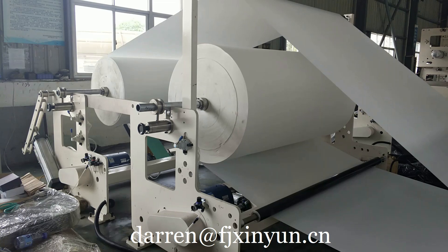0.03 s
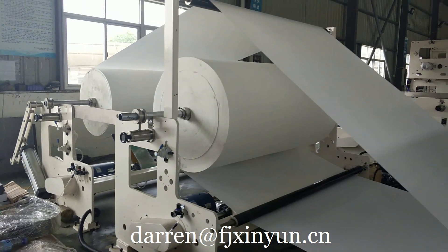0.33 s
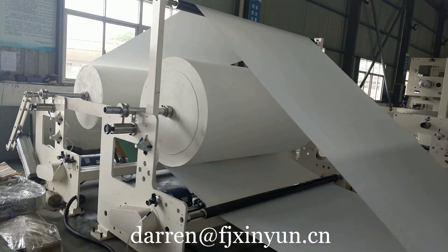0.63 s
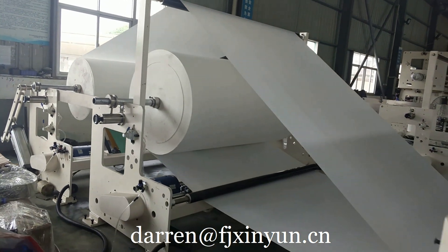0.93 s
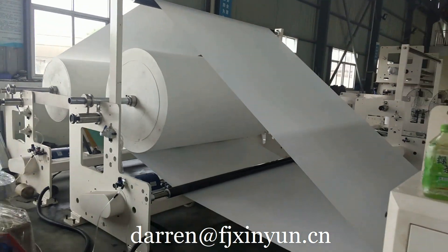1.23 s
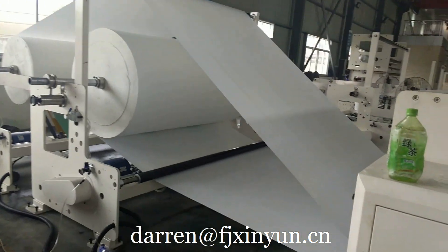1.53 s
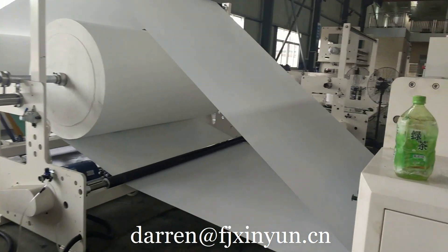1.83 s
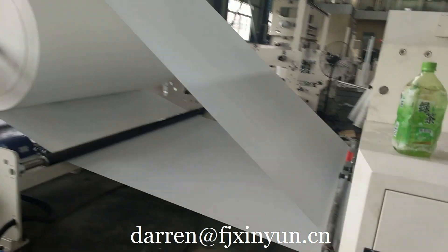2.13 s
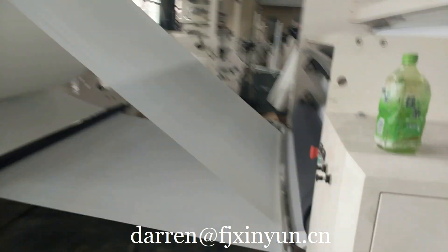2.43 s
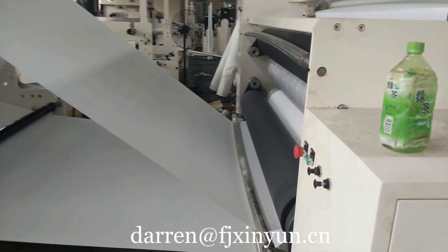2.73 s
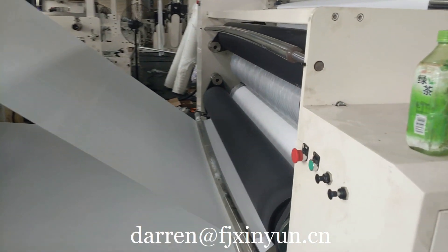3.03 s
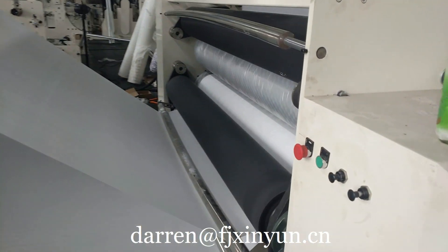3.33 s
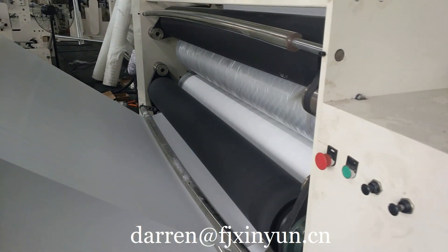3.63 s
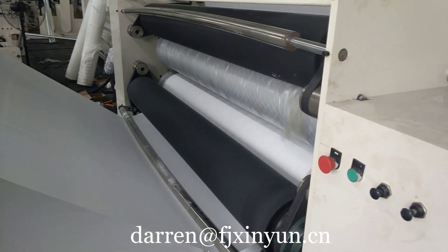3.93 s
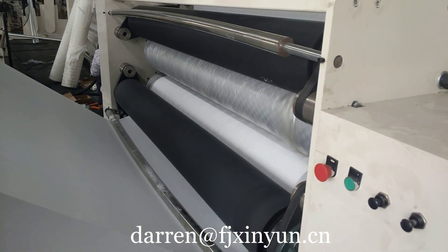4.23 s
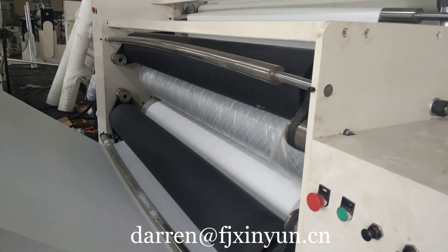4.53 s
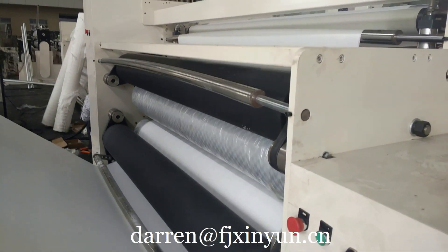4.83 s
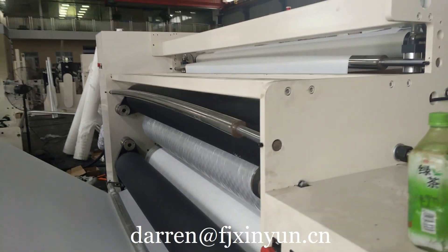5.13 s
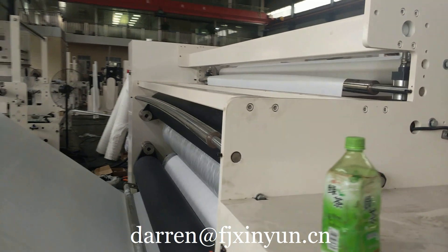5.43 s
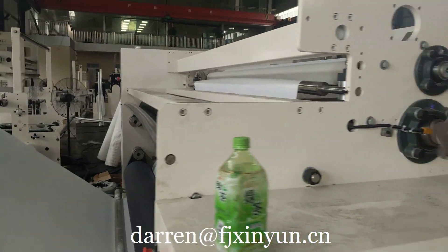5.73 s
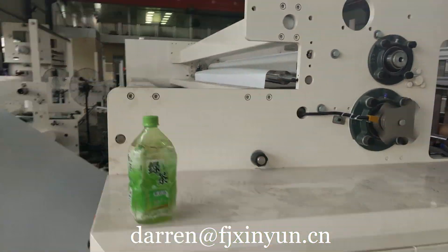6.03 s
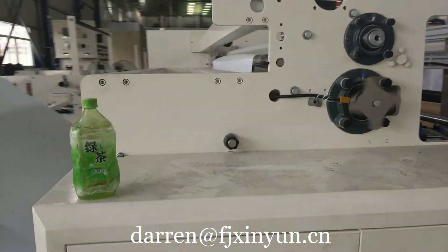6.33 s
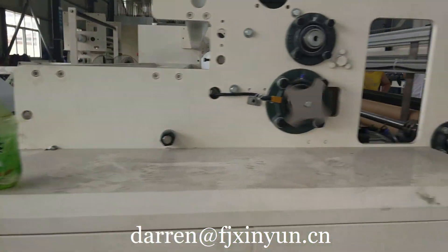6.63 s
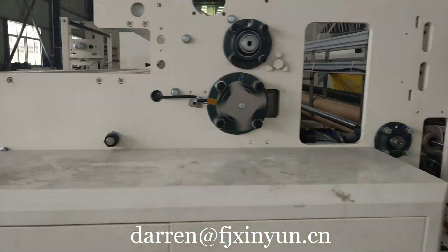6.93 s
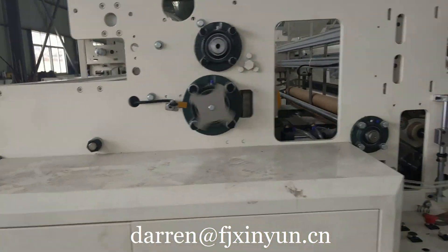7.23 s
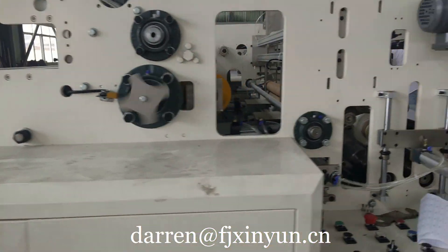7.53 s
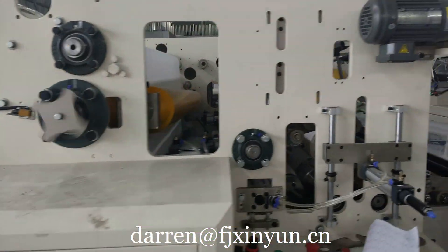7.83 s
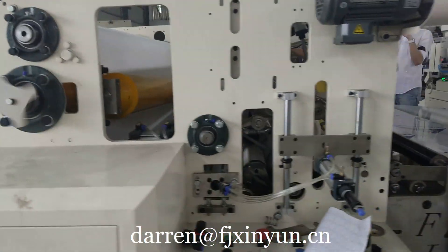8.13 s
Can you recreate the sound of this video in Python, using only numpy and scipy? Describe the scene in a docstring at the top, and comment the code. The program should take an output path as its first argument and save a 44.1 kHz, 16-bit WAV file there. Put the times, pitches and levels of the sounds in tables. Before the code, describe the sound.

Heard by someone walking alongside it in a factory hall, a large paper machine starts abruptly after brief silence and settles to full speed. Paper rustles and hisses in quick pulses, rollers whine at a high pitch, and the drive hums and throbs underneath. Small metal knocks, clinks and faint squeaks dot the noise. It swells midway beside the rollers, a hard clack follows nearby, and the hiss and whine swell again at the end.

```python
"""In a factory hall, a listener walks along a paper rewinder as it comes up to speed.
The drive throbs and forces frame, panels and rollers into low resonance. The paper web rustles, hisses
and chirps four times a turn of the embossing roller, whose teeth whine; the unwinding reel rasps once
a turn. Steel knocks, clinks and pings, something clacks close by, and last a gear motor growls. Paper
and whine are louder at each opening in the frame. The sound cuts in after a moment of silence."""
import sys
import numpy as np
from scipy import signal
from scipy.fft import rfft, irfft, next_fast_len
from scipy.io import wavfile
from scipy.ndimage import map_coordinates

SR = 44100
rng = np.random.default_rng(int(sys.argv[2]) if len(sys.argv) > 2 else 0)


def unload_wav(signal):
    """Save mono or channel-first audio to the path in sys.argv[1] as 16-bit WAV at rate SR, clipped to [-1, 1]."""
    wavfile.write(
        sys.argv[1],
        SR,
        np.round(np.clip(np.atleast_2d(signal).T, -1, 1) * 32767).astype(np.int16),
    )


N = 365588
ROLLER_HZ, DRIVE_HZ = 6.245, 3.572  # turns a second at running speed


def undb(db):
    """Amplitude ratio of a level: a factor of ten for every 20 dB."""
    return 10 ** (np.asarray(db) / 20)


def curve(table):
    """Linear interpolation of (t/s, value) rows at every sample."""
    return np.interp(np.arange(N) / SR, *np.transpose(table))


def passing(at_s, half_s):
    """Gaussian envelope: 1 at at_s, 1/e at half_s to either side."""
    return np.exp(-((np.arange(N) / SR - at_s) / half_s) ** 2)


def colour(points, hz):
    """Interpolation of (f/Hz, value) rows on a logarithmic frequency axis."""
    f, value = np.transpose(points)
    return np.interp(np.log(hz + 1), np.log(f), value)


def unit(x):
    """Normalisation: the mean of the two channels gets rms 1."""
    return x / np.std(x.mean(axis=0))


def pan(db):
    """Left and right gains for an interaural level difference, left minus right."""
    return undb(np.array([[1], [-1]]) * db / 2)


def noise():
    """White noise, uncorrelated between the ears."""
    return rng.standard_normal((2, N))


def drift(rate):
    """Random modulation: `rate` Gaussian values a second joined by lines, spread near 1."""
    steps = np.arange(N) / SR * rate
    return 1.47 * np.interp(steps, np.arange(N), rng.standard_normal(N))


def shaped(x, gain):
    """Filter a noise pair by gain(f); as in a diffuse field, only the bass is coherent at the ears."""
    # interaural coherence: f/Hz, correlation
    coherence = [(100, 0.96), (280, 0.9), (500, 0.81), (900, 0.058), (2000, 0.099), (4000, .015)]
    size = next_fast_len(N, real=True)
    hz = np.arange(size // 2 + 1) * SR / size
    alike = np.clip(colour(coherence, hz), -1, 1)
    mid, side = rfft(x, size) * gain(hz) * np.sqrt([1 + alike, 1 - alike])
    return unit(irfft([mid + side, mid - side], size)[:, :N])


def wash(spectrum, x):
    """Source and filter: the excitation x takes on a spectrum of (f/Hz, level/dB) rows."""
    return shaped(x, lambda hz: undb(colour(spectrum, hz)))


def band(centre_hz, width_hz):
    """A resonance under random excitation: narrow-band noise with steep skirts."""
    return shaped(noise(), lambda hz: 1 / (1 + (1.08 * (hz - centre_hz) / width_hz) ** 2))


def steady(centre_hz, width_hz):
    """Narrow-band noise of constant envelope: only its phase wanders."""
    analytic = signal.hilbert(band(centre_hz, width_hz), next_fast_len(N))[:, :N]
    return unit(np.cos(np.angle(analytic)))


def shifted(x, by_hz, age):
    """Single-sideband modulation moves every component of x by the same frequency."""
    return np.real(signal.hilbert(x) * np.exp(2j * np.pi * by_hz * age))


def held(age, length_s, edge_s):
    """Gate envelope: linear attack, hold until length_s, exponential decay."""
    return np.clip(age / edge_s, 0, 1) * np.exp(-np.maximum(age - length_s, 0) / edge_s)


def surges(turns, peak_at, tight_at, depth_db, wobble_db):
    """Amplitude modulation: four surges a turn, one wobble from eccentricity; phases in turns."""
    quarterly_db = depth_db * np.cos(8 * np.pi * (turns - peak_at))
    return undb(quarterly_db + wobble_db * np.cos(2 * np.pi * (turns - tight_at)))


def frame():
    """Forced vibration: the steel frame rumbles broadly and hums at its resonances."""
    # rumble spectrum: f/Hz, level/dB
    spectrum = [(20, -29), (42, -37), (58, -6.5), (100, -2.5), (130, -2.5), (200, -0.5), (290, 1),
                (360, 0.5), (480, -6.5), (700, -12.5), (1200, -42)]
    # modes of drive and frame: f/Hz, width/Hz, relative level/dB
    modes = [(55.3, 3.9, -24), (72.5, 6.3, -11.5), (109, 8.2, -10), (151.3, 3.7, -8.5), (172.9, 1.5, -11),
             (219, 11, -11.5), (298.3, 5, -10)]
    hums = sum(undb(db) * band(hz, width) for hz, width, db in modes)
    rumble = undb(3.5 + drift(9)) * wash(spectrum, noise())
    return (rumble + hums) * pan(2.2)


def drive(run, nearness, rise_s=0.015, idle_db=0.5, clack_decay_s=0.017, clack_db=-7):
    """Periodic excitation: the drive throbs four times a turn, and a clack leads into each throb."""
    # load pulses: phase/turns, relative level/dB
    pulses = [(.125, 3.5), (.45, 3), (.57, -3), (0.823, 5)]
    # throb spectrum: f/Hz, level/dB
    spectrum = [(200, -24), (320, -9.5), (380, -1), (480, 1), (540, -7.5), (700, -8), (1000, -8),
                (1500, -26)]
    throb, clack = 0, 0
    for phase, db in pulses:
        age = (run * DRIVE_HZ - phase) % 1 / DRIVE_HZ
        throb = throb + undb(db) * age / rise_s * np.exp(1 - age / rise_s)
        clack = clack + undb(2 * db) * np.exp(-age / clack_decay_s)
    load = undb(idle_db) + np.sqrt(nearness) * throb
    body = undb(-4.5 + drift(25)) * wash(spectrum, noise())
    return (load * body + nearness * undb(clack_db) * clack * band(1080, 710)) * pan(4.2)


def motor(run, hz=231, base_db=-44.6, waver_rad=.28, rough_db=-10, flutter_db=.7):
    """The motor drones on a tone proportional to its speed; phase modulation makes it waver."""
    # places where the drone carries: t/s, half length/s, gain/dB
    swells = [(2.15, .95, 8), (4.3, 1.5, 7.2), (6.2, .8, 6.8)]
    level_db = base_db + sum(db * passing(s, half_s) for s, half_s, db in swells)
    tone = np.sqrt(2) * np.sin(2 * np.pi * hz * run + waver_rad * drift(7.4))
    tone *= undb(flutter_db * drift(2.63))
    return (tone + undb(rough_db) * band(hz, 8)) * undb(level_db) * pan(2.8)


def side_panels(base_db=-45.5):
    """Plate resonance: shaken sheet-metal panels boom, louder as the listener passes them."""
    # panels passed: t/s, half length/s, gain/dB
    passes = [(1.05, 0.61, 6), (7.1, 0.49, 8)]
    # plate modes: f/Hz, width/Hz, relative level/dB
    modes = [(297, 14, -5.5), (330.3, 12, -2), (352.8, 6.7, 2), (383, 13.5, -2.5)]
    level_db = base_db + sum(db * passing(s, half_s) for s, half_s, db in passes)
    boom = sum(undb(db) * steady(hz, width) for hz, width, db in modes)
    return boom * undb(level_db) * pan(1.4)


def hall_mode(mean_db=-54.5, swing_db=8.5, antinode_s=1.9, spacing_s=5.3):
    """A standing wave in the hall swells and fades as the listener walks through its antinodes."""
    crest = np.cos(2 * np.pi * (np.arange(N) / SR - antinode_s) / spacing_s)
    return band(66, 13) * undb(mean_db + swing_db * crest) * pan(2.1)


def paper_colour(excitation):
    """The paper acts as a broad filter on whatever excites it."""
    # rustle spectrum: f/Hz, level/dB
    spectrum = [(300, -10), (600, -2.5), (950, 0.5), (1300, -1), (1650, -2), (2100, 0.5), (2700, 1),
                (3500, -1.5), (4400, 2), (5500, 1.65), (6500, 1.4), (8000, -3), (15000, -30)]
    return wash(spectrum, excitation)


def web(surge, surge_exponent=0.34):
    """Taut paper rustles in tiny grains and excites the lightly damped modes of the rollers."""
    # steel roller modes: f/Hz, width/Hz, relative level/dB
    modes = [(1610, 7, -24), (1724, 8, -26), (1795, 7, -25.5), (1850, 54, -21.5), (1896, 10, -20.5),
             (2072, 9, -21.5)]
    grains = noise() * undb(drift(700))
    rustle = paper_colour(grains) * surge ** surge_exponent * undb(0.43 + .5 * drift(14))
    ring = sum(undb(db) * band(hz, width) for hz, width, db in modes)
    beside_bearings = undb(3 * passing(at_s=6.15, half_s=0.69))
    return rustle + beside_bearings * ring


def ticks(turns, scatter_db=1.8, rise_s=0.0012):
    """Periodic contact: high spots on the roller tick and scrape at the same phases of every turn."""
    # high spots: phase/turns, f/Hz, width/Hz, decay/s, relative level/dB
    spots = [(.05, 1500, 800, 0.0036, -2), (.05, 6200, 600, 0.0086, 0), (.3, 2000, 400, 0.0051, 2),
             (.3, 6400, 1200, 0.0025, 8.5), (.375, 3380, 1600, 0.012, 3), (.555, 6300, 700, .005, 5.5),
             (.555, 2030, 407, 0.0063, 2), (.805, 1800, 450, 0.017, -5)]
    out = 0
    for phase, hz, width, decay_s, db in spots:
        age = (turns - phase) % 1 / ROLLER_HZ
        force = np.exp(-age / decay_s) * (1 - np.exp(-age / rise_s))
        out = out + force * undb(db + scatter_db * drift(5.5)) * band(hz, width)
    return out


def crackle(snaps_per_s=260, spread_db=3, decay_s=0.00065, gain_db=-11):
    """A Poisson process: small creases snap independently, each with a very short noise burst."""
    snaps = (rng.random(N) < snaps_per_s / SR) * undb(spread_db * rng.standard_normal(N))
    bursts = signal.lfilter([1], [1, -np.exp(-1 / (decay_s * SR))], snaps)
    return undb(gain_db) * paper_colour(noise() * bursts)


def nip_whine(run, turns, slowness, upper_slow_db=-3.0):
    """The embossing roller's fine teeth sing in rough bands, at frequencies proportional to speed."""
    # whine at running speed: f/Hz, width/Hz, relative level/dB
    bands = [(7445, 235, 1.5), (9200, 170, -1.5), (15030, 490, -12)]
    lowest, *upper = (undb(db) * band(hz, width) for hz, width, db in bands)
    whine = lowest + undb(upper_slow_db * slowness) * sum(upper)
    at_speed = np.array([map_coordinates(ear, [run * SR], order=5, mode="nearest") for ear in whine])
    surge = surges(turns, peak_at=0.012, tight_at=0.67, depth_db=1.23, wobble_db=0.5)
    return at_speed * surge * undb(-1 + drift(60))


def nip_hiss(surge):
    """Modulated noise: paper peels off the roller in four surges a turn, brighter on the left."""
    # peeling spectrum: f/Hz, level/dB
    spectrum = [(5500, -27), (7000, -30), (8000, 0.5), (8700, 5), (9900, 4), (10800, 0), (12000, -4),
                (13500, -9.5), (15500, -35)]
    # interaural difference: f/Hz, left minus right/dB
    balance = [(8500, -2), (10500, 6), (12000, 4.5), (15000, 12)]
    grains = noise() * undb(drift(500))
    hz = np.arange(N // 2 + 1) * SR / N
    hiss = irfft(rfft(wash(spectrum, grains)) * pan(colour(balance, hz)), N)
    return hiss * surge * undb(-1.83 + 0.24 * drift(18))


def chirps(turns):
    """Friction: in spells the paper squeaks on the roller each quarter turn, two strong, two weak."""
    # spells of squeaking: t/s, half length/s, f/Hz, width/Hz, level/dB
    spells = [(.85, 0.58, 10240, 600, -23.5), (2.28, .22, 9400, 800, -23), (6.47, 0.37, 9400, 1400, -21.5),
              (8.2, 0.14, 9300, 900, -24)]
    grip = ((1 + np.cos(2 * np.pi * 4 * turns)) / 2) ** 2
    strength = 1 + .35 * np.cos(2 * np.pi * (turns - .88))
    squeak = sum(undb(db) * passing(s, half_s) * band(hz, width) for s, half_s, hz, width, db in spells)
    return squeak * grip * strength * pan(1.6)


def knocks(centre_hz=2100, rise_s=.0008, ring_decay_s=.009, thud_decay_s=0.0078):
    """Impact excitation: each knock is a damped rattle in the steel shaft over a duller thud."""
    # stray knocks: t/s, relative level/dB, ring f/Hz, thud gain/dB
    impacts = [(1.358, -19, 2020, -10), (1.932, -20.5, 2300, -17), (2.2746, -16, 1994, -10),
               (2.846, -18, 2160, -13), (3.571, -19, 1866, -6), (3.7327, -19, 1840, -11),
               (3.772, -17.5, 1940, -14), (4.691, -17.5, 1840, -16), (5.333, -21, 2250, -14),
               (5.832, -22, 2180, -16), (5.8505, -20.5, 2090, -17), (5.901, -18.5, 2270, -17),
               (6.807, -23, 2440, -18)]
    out, age = np.zeros((2, N)), np.arange(SR // 8) / SR
    body, rattle = band(590, 680), steady(centre_hz, 650)
    for s, db, hz, thud_db in impacts:
        span = int(s * SR) + np.arange(len(age))
        ring = undb(-5) * shifted(rattle[:, span], hz - centre_hz, age) * np.exp(-age / ring_decay_s)
        thud = undb(thud_db - 8) * body[:, span] * np.exp(-age / thud_decay_s)
        out[:, span] += undb(db) * (1 - np.exp(-age / rise_s)) * (ring + thud)
    return out


def reel(run, turn_s=.9235, first_s=.523, grain_db=-1.5):
    """Paper peels off the unwinding reel with one rasp a turn, fading in a panel's acoustic shadow."""
    # bands of a rasp: f/Hz, width/Hz, delay/s, length/s, level/dB
    bands = [(3170, 550, 0, .02, -30), (2250, 330, .003, .02, -30), (3300, 1700, .018, .014, -33)]
    # transmission to the listener: t/s, gain/dB
    audibility = [(1.4, -3), (2.4, -3.5), (3.3, -2), (5.2, -1.5), (6.2, -9), (8, -30)]
    out = 0
    for hz, width, delay_s, length_s, db in bands:
        age = (run - first_s - delay_s) % turn_s
        out = out + undb(db) * held(age, length_s, edge_s=.003) * steady(hz, width)
    return out * undb(curve(audibility) + grain_db * drift(480))


def clinks(sag_hz_per_s=4000, rough_db=2.5, right_lag_s=.00004):
    """Steel rings in a single mode for an instant, sagging slightly in pitch."""
    # clinks, most within the reel's rasps: t/s, f/Hz, length/s, level/dB
    notes = [(2.377, 3070, .013, -30), (2.382, 2330, .009, -31), (3.3, 2290, .015, -24.5),
             (4.221, 2350, .017, -23), (5.143, 2320, .017, -25), (5.144, 3730, .009, -29),
             (6.807, 2420, .006, -29)]
    out, age = np.zeros((2, N)), np.arange(SR // 16) / SR
    grain = undb(rough_db * drift(400))
    ear_age = age - np.array([[0], [right_lag_s]])
    for s, hz, length_s, db in notes:
        span = int(s * SR) + np.arange(len(age))
        tone = np.sin(2 * np.pi * (hz - sag_hz_per_s * ear_age / 2) * ear_age)
        out[:, span] += undb(db) * held(age, length_s, edge_s=.0025) * grain[span] * tone
    return out


def roller_booms(centre_hz=430, width_hz=25, rise_s=0.012, gain_db=3):
    """Resonance: the hollow rollers boom for a moment under hard throbs, at listed times."""
    # booms: t/s, f/Hz, relative level/dB
    booms = [(3.031, 435, -30.5), (3.506, 475, -33), (3.588, 438, -24.5), (3.67, 396, -27),
             (3.757, 378, -28), (3.862, 457, -30), (3.983, 404, -29.5), (4.154, 439, -28),
             (4.353, 418, -35), (4.423, 418, -26.5), (4.539, 472, -28), (4.629, 390, -34),
             (4.729, 439, -32), (4.788, 383, -28), (4.885, 475, -28), (4.992, 385, -31), (5.084, 425, -32),
             (5.275, 464, -27), (5.546, 422, -28.5), (5.834, 422, -27.5), (5.995, 478, -32),
             (6.107, 394, -29), (7.255, 367, -30)]
    out, age = np.zeros((2, N)), np.arange(SR // 5) / SR
    ring = steady(centre_hz, width_hz)
    swell = age / rise_s * np.exp(1 - age / rise_s)
    for s, hz, db in booms:
        span = int(s * SR) + np.arange(len(age))
        out[:, span] += undb(db) * swell * shifted(ring[:, span], hz - centre_hz, age)
    return out * undb(gain_db) * pan(2.1)


def pings(turns, hz=4500, width_hz=310, rise_s=0.0032, tail_s=0.011, tail_db=-9):
    """Damped free vibration: the steel roller pings once a turn, heard at each opening."""
    # spells of pinging: t/s, half length/s, phase/turns, decay/s, relative level/dB
    spells = [(4.43, .78, .327, .005, -19.3), (7.9, .9, .365, .008, -30)]
    envelope = 0
    for s, half_s, phase, decay_s, db in spells:
        age = (turns - phase) % 1 / ROLLER_HZ
        decay = np.exp(-age / decay_s) + undb(tail_db) * np.exp(-age / tail_s)
        exposure = np.minimum(2 * passing(s, half_s), 1)
        envelope = envelope + undb(db) * exposure * decay * (1 - np.exp(-age / rise_s))
    return envelope * steady(hz, width_hz)


def clatter(contact_s=.00006, right_lag_s=.00043, echo_db=-5, echo_s=.022):
    """Impact and reflection: something hard bounces close by on the left; the frame echoes it."""
    # the clack and its bounces: t/s, relative level/dB
    impacts = [(5.612, -10.5), (5.6134, -15), (5.618, -19), (5.6214, -9.5), (5.626, -20)]
    # modes of the struck body: f/Hz, decay/s, relative level/dB
    modes = [(240, .007, -8), (700, .0035, -2), (1020, .002, -1), (1400, .002, 0), (1800, .002, .5),
             (2250, .0017, -1.5)]
    age = np.arange(SR // 8) / SR
    ring = sum((-1) ** k * undb(db) * np.exp(-age / decay_s) * np.sin(2 * np.pi * hz * age)
               for k, (hz, decay_s, db) in enumerate(modes))
    contact = age / contact_s ** 2 * np.exp(-age / contact_s) / SR  # finite contact time dulls the ring
    ring = signal.fftconvolve(ring, contact)[:len(age)]
    blows = np.zeros((2, N))
    for s, db in impacts:
        blows[0, int(s * SR)] += undb(db)
        blows[1, int((s + right_lag_s) * SR)] += undb(db)
    direct = signal.fftconvolve(blows, ring[None], axes=1)[:, :N] * pan(2.5)
    echo_envelope = np.exp(-age / echo_s) * undb(echo_db) / np.sqrt(SR * echo_s)
    echo = rng.standard_normal((2, len(age))) * echo_envelope
    return direct + signal.fftconvolve(direct, echo, axes=1)[:, :N]


def gearbox():
    """Level rises with proximity: the gear motor at the far end growls as the listener nears it."""
    # growl: f/Hz, width/Hz, level/dB
    bands = [(62, 35, -46), (140, 50, -46), (660, 300, -43)]
    growl = sum(undb(db) * band(hz, width) for hz, width, db in bands)
    return passing(at_s=8.15, half_s=1) * growl * pan(2)


def scene():
    """Superposition: one speed times the turning parts, and openings in the frame change the mix."""
    # run-up: t/s, share of running speed
    run_up = [(.6, .912), (2.07, 1), (8.3, 1)]
    # roller bay and side window: t/s, half length/s, then gain/dB of throb, web, whine and hiss
    openings = [(4.394, 1.74, 1.5, 4, 3.5, 2), (8.254, 1.3, -2.5, 2.5, 4.5, 2.5)]
    # direction of the nip between the rollers: t/s, left minus right/dB
    nip_balance = [(1.9, -2), (4.07, 0), (6.53, -3), (8.15, -0.5), (8.29, 0)]
    speed = curve(run_up)
    run = np.cumsum(speed) / SR
    run += N / SR - run[-1]  # paper travel, in seconds at running speed
    turns = run * ROLLER_HZ
    slowness = (1 - speed) / (1 - speed[0])  # 1 at the starting speed, 0 at running speed
    views = np.array([passing(s, half_s) for s, half_s, *_ in openings])
    throb_db, web_db, whine_db, hiss_db = np.transpose([gains for _, _, *gains in openings]) @ views
    nearness = undb(-20.5) + views[0]  # to the roller bay
    surge = surges(turns, peak_at=0.07, tight_at=0.082, depth_db=1.5, wobble_db=0.93)
    rumble = undb(-34.5 - slowness) * frame()
    throb = undb(-33.5 + throb_db) * drive(run, nearness)
    low = rumble + throb + roller_booms() + motor(run) + gearbox() + side_panels() + hall_mode()
    paper = undb(-31.5 + web_db + 0.5 * slowness) * (web(surge) + nearness * (ticks(turns) + crackle()))
    whine = undb(-29.5 + whine_db - 5 * slowness) * nip_whine(run, turns, slowness)
    hiss = undb(-25 + hiss_db - 4 * slowness) * nip_hiss(surge)
    nip = (whine + hiss + chirps(turns)) * pan(curve(nip_balance))
    return low + paper + nip + pings(turns) + reel(run) + clinks() + knocks() + clatter()


def record(dry):
    """Gating and band limiting: the sound cuts in, swells to full level and loses its top treble."""
    start_s, fade_s, fade_db, cutoff_hz = .622, 0.26, -11.5, 15150
    age = np.arange(N) / SR - start_s
    gate = np.clip(age / .005, 0, 1)
    fade = undb(fade_db * np.clip(1 - age / fade_s, 0, 1))
    low_pass = signal.ellip(12, .2, 90, cutoff_hz, fs=SR, output="sos")
    return signal.sosfilt(low_pass, dry * gate * fade)


dry = scene()
out = record(dry)
unload_wav(out)
```